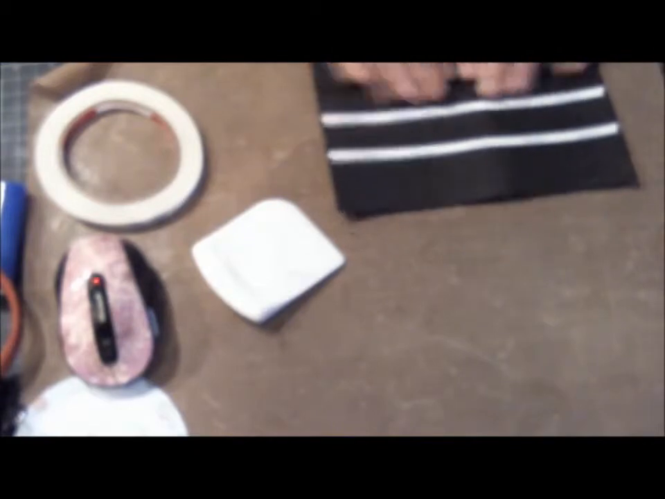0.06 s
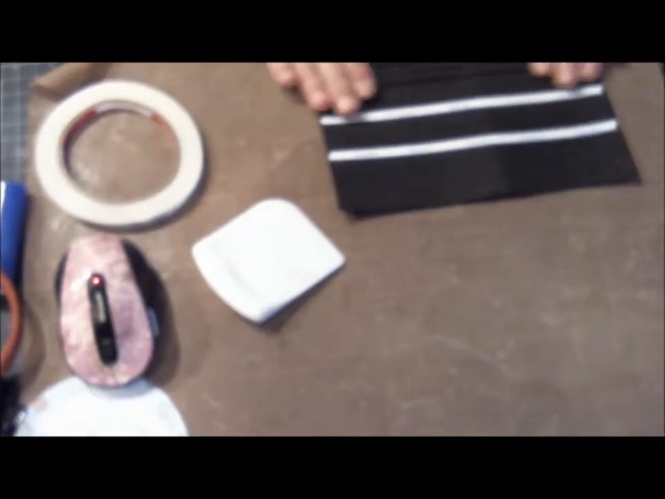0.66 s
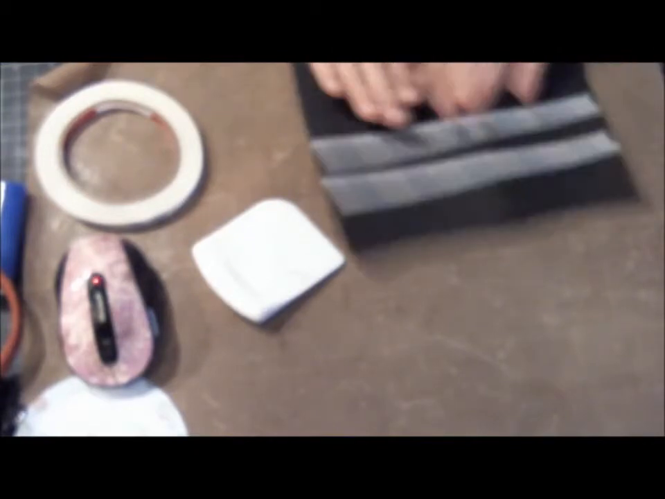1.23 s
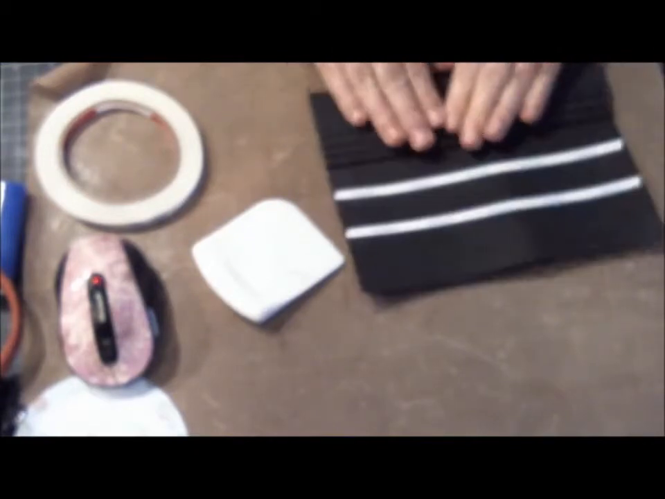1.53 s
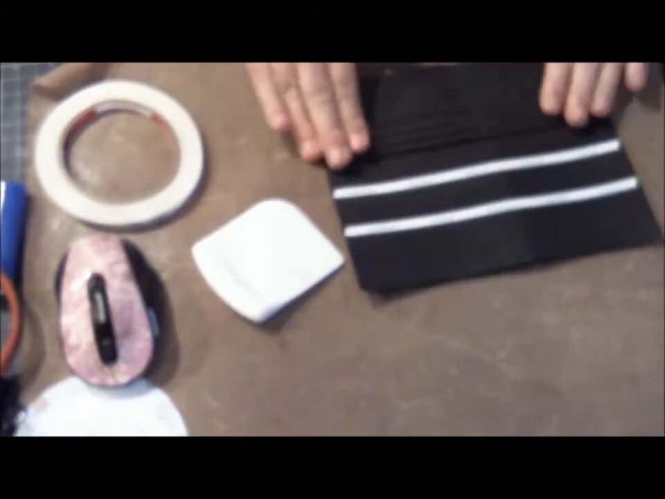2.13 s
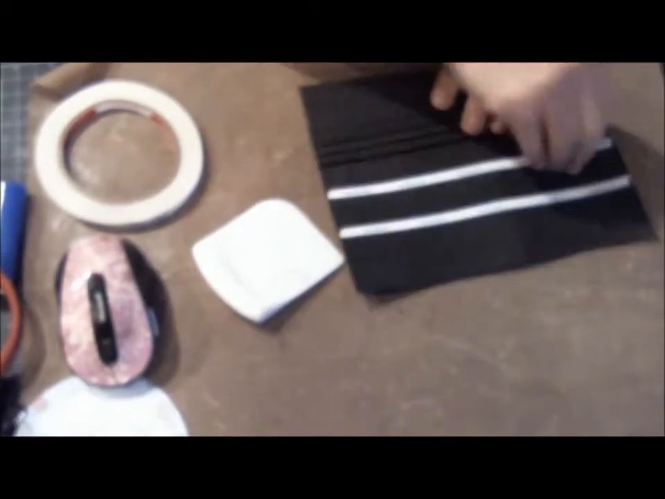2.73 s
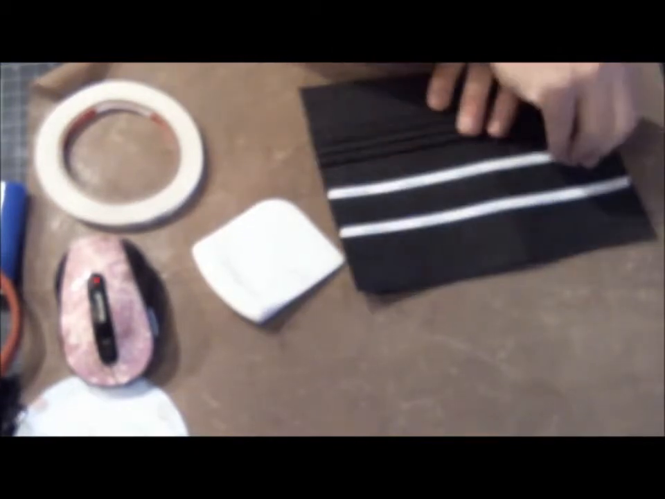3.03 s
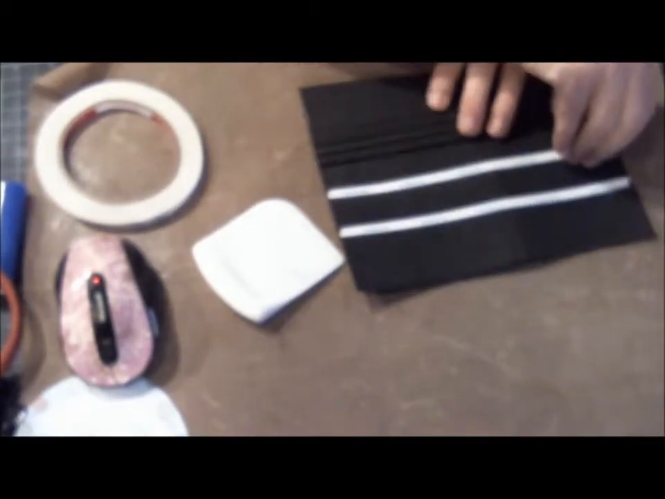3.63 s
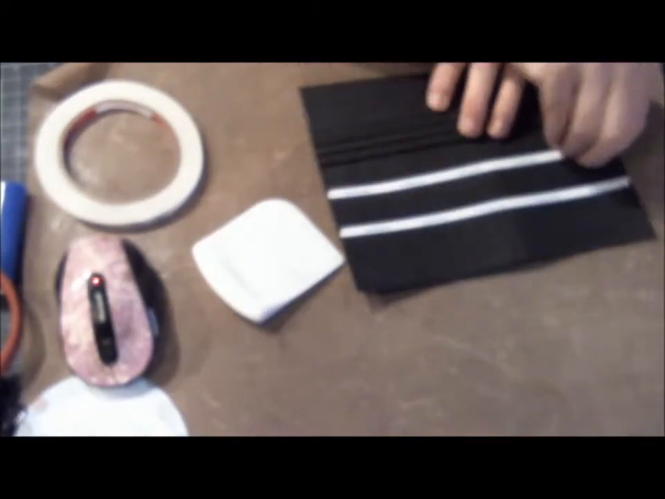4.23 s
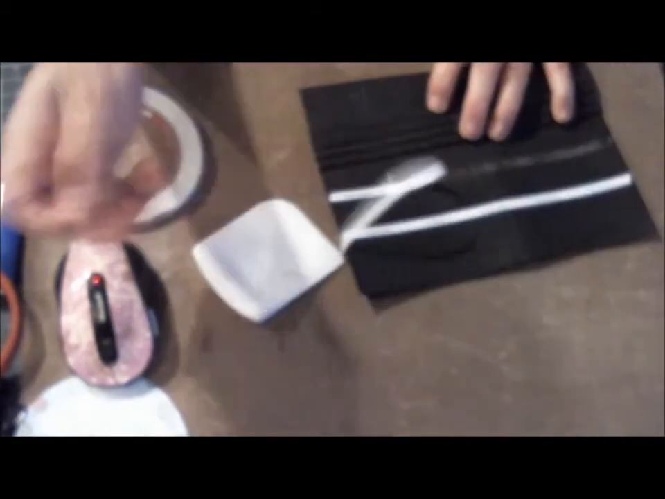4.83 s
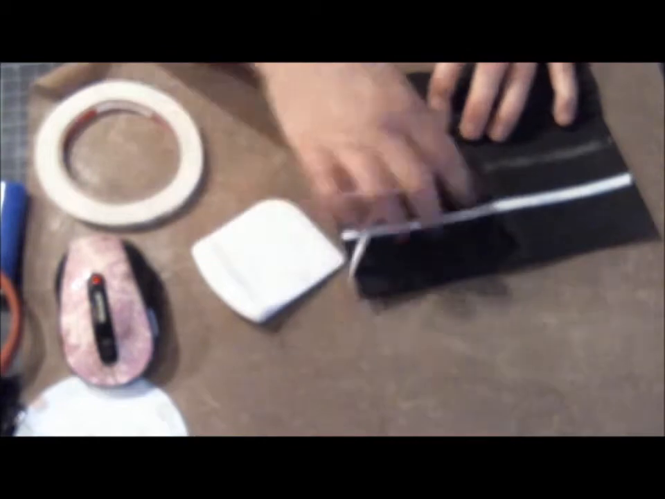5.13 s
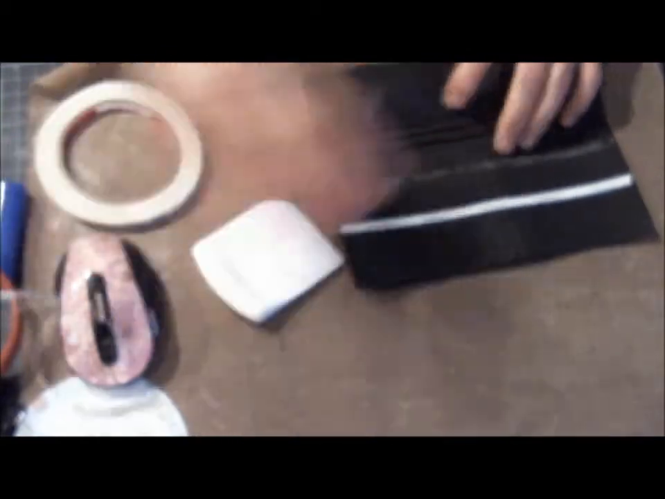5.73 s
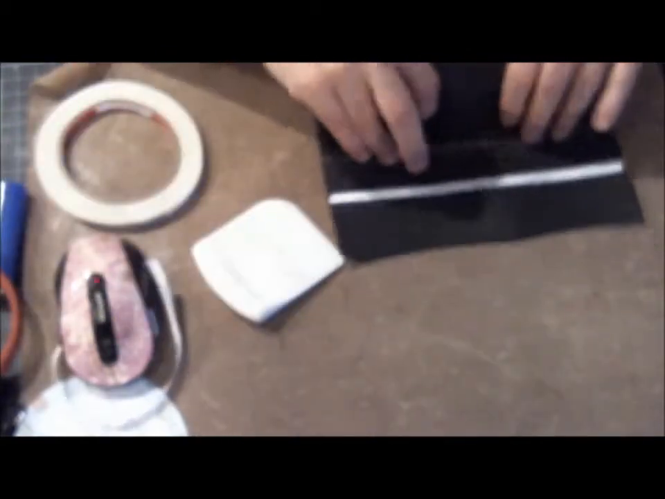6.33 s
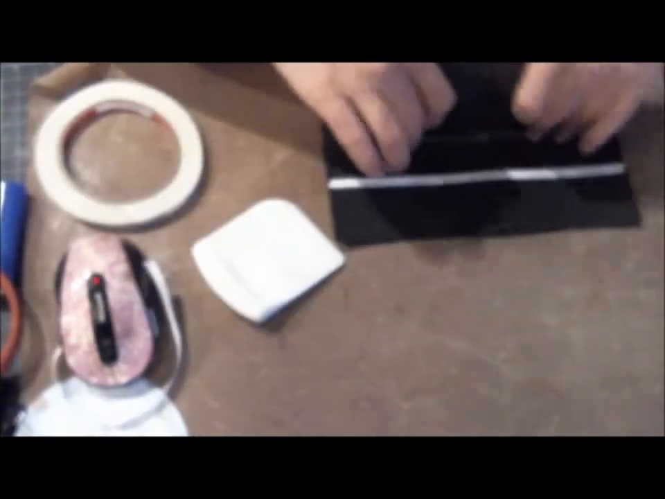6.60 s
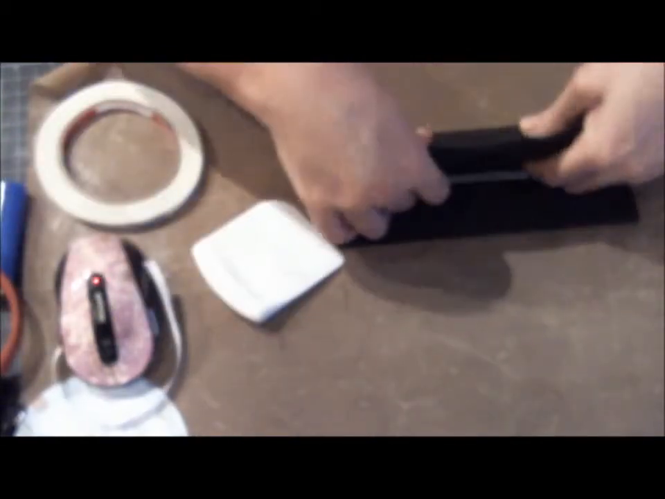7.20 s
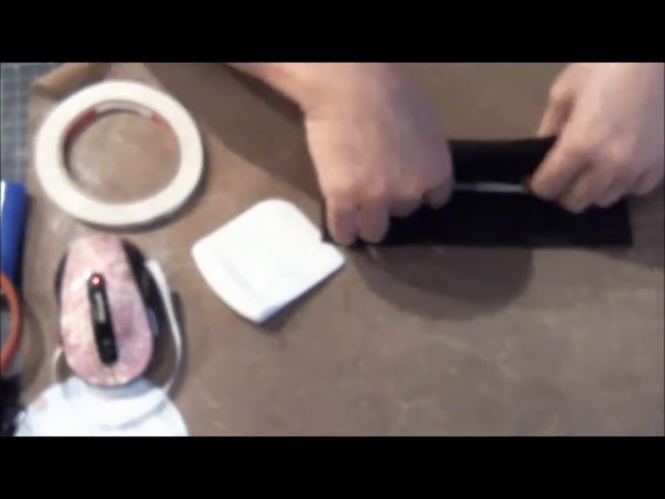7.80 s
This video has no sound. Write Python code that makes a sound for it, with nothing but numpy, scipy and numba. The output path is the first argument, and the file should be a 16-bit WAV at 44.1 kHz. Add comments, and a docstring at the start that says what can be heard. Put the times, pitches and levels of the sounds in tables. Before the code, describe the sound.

In a small room, a desk microphone hears heavy card being rubbed and shifted over a table in uneven, papery swishes, with a few ticks and a soft bump. A lull leaves only faint hum, a thin whine and low blips. Then a tape backing comes away with a light crackle and a bright flick. Sharp clicks and a hollow clap follow, the card snaps along its folds, and a last rub ends in dull table thumps.

```python
"""First you hear hands sliding and pressing a sheet of heavy card over a craft table: its fibres catch
and slip, so it hisses and rasps. Then the liner comes off a strip of tape in little jerks, and the card
is folded, its scored creases giving way with sharp snaps. Now and then the table gives a dull thump.
One desk microphone hears it all in a small room, with faint low blips, a hum and an electronic whine."""
import sys
import numpy as np
from scipy import signal
from scipy.fft import rfft, irfft, next_fast_len
from scipy.io import wavfile
from scipy.ndimage import uniform_filter1d
from numba import njit

SR = 44100
rng = np.random.default_rng(int(sys.argv[2]) if len(sys.argv) > 2 else 0)


def transcribe(u):
    """Save the signal u as a 16-bit wav file named by the first command-line argument.

    u: samples, shape (n,) or (channels, n), limited to [-1, 1]; the rate is SR.
    q: integer samples, one column per channel.
    """
    v = np.clip(np.atleast_2d(u).T, -1, 1)
    q = np.round(v * 32767).astype(np.int16)
    wavfile.write(sys.argv[1], SR, q)


N = 351064
TIME = np.arange(N) / SR

# Creases giving way. Each row: start in seconds, relative level in dB, brightness in dB per octave,
# flutter time in seconds, lower and upper edge of the sound's range in Hz.
CREASE_SNAPS = [(6.2066, -6.5, 0.3, 0.0032, 448, 4830), (6.5263, -7, -0.67, 0.017, 150, 11100),
                (7.259, -7, 0.5, 0.012, 1020, 10800)]
# The tone of a crease, then of a tick. Each row: frequency in Hz, relative level in dB.
CREASE_SPECTRUM = [(100, -20), (300, -13), (520, -9.5), (850, -6), (1100, 1.5), (1400, 0.5), (2150, 1.5),
                   (2650, -3.5), (3700, -2), (5000, -4.5), (6200, -5.5), (7500, -24), (10500, -29.5),
                   (15500, -61)]
TICK_SPECTRUM = [(100, -39), (500, -31.5), (1200, -13.5), (2400, -22.5), (4000, -0.5), (5000, 0), (6100, 9),
                 (6800, -6.5), (7700, -23), (10000, -40), (13000, -46), (16000, -96)]


def sliding_card():
    """Light sliding hisses; under pressure, coarser slips rasp and set the sheet itself ringing."""
    # The tone of each of the four layers. Each row: frequency in Hz, relative level in dB.
    hiss_spectrum = [(2200, -46.5), (3300, -26.5), (4300, -7.5), (5100, -1.5), (6000, 4), (6600, -3),
                     (7200, -13), (7800, -46), (9000, -31), (15000, -62.5)]
    rasp_spectrum = [(1500, -57), (2400, -6), (2950, -1.5), (3500, -1.5), (4100, -0.5), (4600, -1),
                     (5500, -7.5), (9000, -45)]
    sheet_spectrum = [(100, -43), (450, -1.5), (1000, -13), (1400, -4.5), (2000, 1), (2350, -2),
                      (3000, -6.5), (5000, -36), (9000, -57)]
    fibre_spectrum = [(3000, -8.5), (6800, -11.5), (8000, 1.5), (9200, 1.5), (10500, -5), (12000, -12),
                      (13500, -22), (15500, -42)]
    # The card rings lower when more of it is free to bend.
    # Each row: time in seconds, pitch of the edge in Hz, pitch of the sheet in Hz.
    card_pitches = [(0, 3660, 1630), (.4, 4120, 1700), (1.02, 3550, 2030), (1.242, 3900, 1480),
                    (1.8, 4300, 1750), (2.3, 4000, 1920), (2.49, 3320, 2000), (4.38, 3960, 2030),
                    (4.5, 3580, 2020), (4.6, 3840, 2050), (5.83, 3940, 1710), (6.09, 3800, 1930),
                    (7.75, 3830, 1780)]
    times, edge_hz, sheet_hz = np.transpose(card_pitches)
    hiss_gain, rasp_gain, sheet_gain, fibre_gain = hand_strokes()
    fine = slips(per_s=9000, spread_db=2.5, smooth_share=1.0)
    coarse = slips(per_s=2600, spread_db=2.0, smooth_share=0.64)
    edge = moving_resonance(coarse, np.interp(TIME, times, edge_hz), width_hz=1040)
    sheet = moving_resonance(coarse, np.interp(TIME, times, sheet_hz), width_hz=600)
    sound = hiss_gain * from_db(-0.5) * rms_one(colour(fine, hiss_spectrum))
    sound += rasp_gain * from_db(0.5) * rms_one(colour(edge, rasp_spectrum))
    sound += sheet_gain * from_db(-0.17) * rms_one(colour(sheet, sheet_spectrum))
    sound += fibre_gain * from_db(0.85) * rms_one(colour(fine, fibre_spectrum))
    judder_db = 1.53 * drift(per_s=73)
    return sound * from_db(judder_db)


def hand_strokes():
    """Each stroke speeds up and slows down; speed and pressure set how loud the sliding layers are."""
    # Swings of hand and card. Each row: start, rise time and fall time in seconds, relative level in dB,
    # pressure from 0 to 1, fibre hiss in dB compared with that level.
    strokes = [ (-.015, 0.042, .065, -38, 0.47, -17), (.026, 0.027, 0.025, -41, 0.83, -16),
               (0.188, .046, 0.076, -48.5, 0.48, -24), (0.295, 0.11, .14, -44, 0.51, -19),
               (.44, .13, 0.064, -48, 0.47, -19), (.58, 0.095, 0.073, -53.5, 0, -22),
               (0.939, 0.03, 0.1, -40, 0.63, -15), (0.996, 0.029, 0.034, -31.5, 0.85, -17.5),
               (1.043, 0.032, .045, -42, 0.77, -23.5), (1.15, 0.069, .03, -54.5, 0.63, -34),
               (1.182, 0.047, .11, -39.5, 0.81, -25), (1.4, 0.078, 0.12, -67.5, 0.8, -24),
               (1.7, .06, .05, -48.5, 0.48, -18), (1.777, 0.054, 0.11, -49.5, 0.54, -18),
               (1.858, 0.037, 0.074, -47.5, .35, -12), (1.905, 0.056, 0.083, -47, .25, -17.5),
               (1.99, 0.079, 0.053, -52, .05, -14), (2.243, 0.066, 0.1, -45, 0.62, -17),
               (2.339, 0.059, 0.074, -39.5, 0.71, -20), (2.429, 0.049, 0.045, -49, 0.84, -27),
               (2.563, 0.011, .07, -66, 0.6, -27), (2.59, .098, .028, -66, 0.5, -15),
               (4.36, 0.066, 0.02, -48.5, 0.79, -31), (4.42, 0.023, 0.056, -55, 0.86, -40),
               (4.46, 0.059, 0.028, -47, 0.88, -40), (4.5, 0.096, 0.086, -55, 0.76, -35),
               (4.818, .024, .028, -69.5, .15, -16), (5.183, .01, 0.039, -61, .45, -20),
               (5.263, 0.027, .06, -63, 0.51, -31), (5.3, 0.076, 0.022, -55, 0.76, -18.5),
               (5.503, 0.044, 0.02, -56.5, 0.64, -20), (5.589, 0.044, 0.031, -54.5, 0.59, -25),
               (5.65, 0.047, 0.04, -61, 0.46, -30), (5.82, 0.011, 0.013, -47.5, .67, -29),
               (5.885, 0.0087, 0.025, -61, 0.6, -32), (6.02, 0.026, 0.027, -50, 0.78, -38),
               (6.076, .012, 0.034, -57, 0.98, -44), (6.15, 0.049, .02, -62, 0.84, -30),
               (6.345, .023, 0.018, -59, 0.74, -33), (6.442, 0.03, .027, -56, 0.4, -30),
               (6.683, .031, 0.022, -55.5, .8, -33), (6.785, 0.02, 0.13, -69, 0.85, -29),
               (6.97, 0.051, 0.038, -65.5, 0.87, -19), (7.285, 0.017, .065, -54.5, 0.79, -37),
               (7.468, 0.025, 0.023, -54.5, 0.5, -19), (7.703, 0.049, 0.045, -46.5, 0.87, -23),
               (7.862, .028, 0.057, -60.5, 0, -15), (7.915, .048, .04, -55.5, 0.1, -36)]
    # How hiss, rasp and ringing sheet answer the hand. Each row: gain in dB at the lightest touch,
    # gain in dB at full pressure, the power that the speed is raised to.
    touch_response = [(0.5, -7.5, 1.13), (-9, 1.5, 1.32), (-33.5, 6, 1.4)]
    power = np.zeros((4, N))
    for start_s, rise_s, fall_s, db, pressure, fibre_db in strokes:
        moving = (TIME > start_s) & (TIME < start_s + rise_s + fall_s)
        ramp = np.interp(TIME[moving] - start_s, [0, rise_s, rise_s + fall_s], [0, 1, 0])
        speed = np.sin(np.pi / 2 * ramp)
        bite = pressure ** 2   # only a firm hand makes the card bite into the table
        gains = [from_db(db + light + bite * (firm - light)) * speed ** growth
                 for light, firm, growth in touch_response]
        gains.append(from_db(db + fibre_db) * speed ** 1.33)
        power[:, moving] += np.square(gains)
    return np.sqrt(power)


def snapping_creases():
    """A crease gives way with a snap, which makes the folded panel ring briefly."""
    # The panel's notes. Each row: pitch in Hz, relative level in dB, seconds to fade by 60 dB.
    panel_notes = [(495, -17, 0.05), (1420, -21.5, 0.0069), (2130, -26, 0.0072), (3660, -24, 0.0049)]
    snaps = cracks(CREASE_SNAPS, CREASE_SPECTRUM, flutter_db=-7.5, gain_db=8.5)
    sound = snaps.copy()
    for hz, db, fade_s in panel_notes:
        decay, turn = from_db(-60 / (fade_s * SR)), 2 * np.pi * hz / SR
        feedback = decay * np.cos(turn)
        ring = signal.lfilter([1, -feedback], [1, -2 * feedback, decay ** 2], snaps + 1e-18)
        sound += from_db(db) * np.sin(turn) * ring
    return sound


def straining_creases(gain_db, rise_s):
    """Fibres in a crease crackle ever louder in the moment before it gives way."""
    strain, t = np.zeros(N), np.arange(-rise_s, 0, 1 / SR)
    for snap_s, db, *_ in CREASE_SNAPS:
        add(strain, snap_s - rise_s, from_db(db + gain_db + 30 * t / rise_s))
    crackle = slips(per_s=2800, spread_db=4.0, smooth_share=0.89)
    return strain * rms_one(colour(crackle, CREASE_SPECTRUM, tilt_db=-1.0))


def ticking_edges():
    """Card edges and fingernails make small, sharp ticks."""
    # Each row: start in seconds, relative level in dB, brightness in dB per octave, flutter in seconds.
    ticks = [(.735, -42, -6.5, 0.007), (1.0105, -42, 5, 0.017), (1.0165, -31, -10, 0.0066),
             (1.0205, -28, 6, 0.0059), (1.043, -31, -2, .005), (4.378, -52, 0, .004),
             (4.3985, -42, -2, 0.0028), (4.412, -55, -6, .0025), (5.1885, -46, 3, 0.0055),
             (5.6822, -43, 1, .006), (5.7146, -21.5, 6, 0.014), (5.7405, -28, 0.5, 0.015),
             (5.7738, -39.5, -4, 0.0029), (6.0255, -41, -2, 0.0033), (6.7752, -21, -4, 0.061),
             (6.8395, -35, 5, 0.0036)]
    return cracks(ticks, TICK_SPECTRUM, flutter_db=-6.0, gain_db=12.0)


def clapping_sheet():
    """The sheet lands on the table with a hollow clap."""
    # Each row: start in seconds, relative level in dB, brightness in dB per octave, flutter in seconds.
    claps = [(5.715, -38.5, -7, 0.042), (5.8225, -27, -4, 0.078), (5.834, -34, -0.5, 0.017),
             (6.7755, -47, -3, 0.011)]
    # The hollow tone. Each row: frequency in Hz, relative level in dB.
    clap_spectrum = [(200, -50), (1000, -31), (1400, -2), (1650, 1.5), (2000, -3.5), (2600, -22),
                     (8000, -48)]
    return cracks(claps, clap_spectrum, flutter_db=-20, gain_db=11.0)


def flicking_tape():
    """The thin liner and the sticky tape flick free and flutter."""
    # Each row: start in seconds, relative level in dB, brightness in dB per octave,
    # flutter time in seconds, lower and upper edge of the sound's range in Hz.
    flicks = [(4.6852, -24, 1.5, 0.021, 800, 17000), (6.7754, -20.5, 9.5, 0.015, 2580, 7600)]
    # The bright tone of a flick. Each row: frequency in Hz, relative level in dB.
    flick_spectrum = [(200, -69), (1200, -45), (2000, -9), (3200, 5.5), (4200, 0), (5500, 6), (6800, -1.5),
                      (7800, -10.5), (10000, -11.5), (12500, -12.5), (14000, -28), (16000, -11)]
    return cracks(flicks, flick_spectrum, flutter_db=19, gain_db=9.0)


def peeling_liner(start_s, end_s, level_db):
    """The liner lets go of the tape in separate little jerks."""
    fade_in, fade_out = (TIME - start_s) / 0.0045, (end_s - TIME) / 0.045
    pulling = np.clip(np.minimum(fade_in, fade_out), 0, 1)
    jerks = slips(per_s=180, spread_db=19.0, smooth_share=0)
    return pulling * from_db(level_db) * rms_one(colour(jerks, TICK_SPECTRUM, tilt_db=-4.5))


def thumps_and_blips(rumble_db, rumble_fade_s):
    """Dull thumps on the table with a brief rumble, and faint, soft low blips in the background."""
    # Each row: time of the peak in seconds, level in dB, pitch in Hz, half the length in seconds.
    low_pulses = [(0.207, -64, 340, .04), (.838, -59.5, 267, 0.027), (1.022, -38.5, 222, .0078),
                  (1.037, -39, 141, 0.01), (1.108, -47, 147, .018), (1.187, -56, 350, 0.033),
                  (1.364, -56, 387, 0.025), (1.524, -56, 358, 0.035), (1.721, -57, 323, 0.02),
                  (1.994, -57, 348, 0.018), (2.353, -57, 328, 0.04), (3.06, -56.5, 137, .033),
                  (3.72, -50.5, 115, 0.029), (4.027, -49, 110, 0.0056), (5.13, -53, 187, 0.034),
                  (5.701, -33, 122, 0.016), (5.796, -42, 99, 0.024), (6.664, -50.5, 306, 0.011),
                  (7.48, -58, 80, 0.022), (7.781, -31, 185, 0.0083), (7.798, -37, 119, 0.027),
                  (7.887, -38.5, 141, 0.013), (7.906, -46.5, 102, .027)]
    # The rumble after each pulse. Each row: frequency in Hz, relative level in dB.
    rumble_spectrum = [(15, -59), (35, -24), (65, 20), (200, 6.5), (420, -15), (700, -12), (3000, -59)]
    pulses, rumble_gain, after = np.zeros(N), np.zeros(N), TIME[:SR // 4]
    for peak_s, db, hz, half_s in low_pulses:
        t = np.arange(-half_s, half_s, 1 / SR)
        swell = np.exp(-(np.pi * t / half_s) ** 2)
        add(pulses, peak_s - half_s, from_db(db) * np.sin(2 * np.pi * hz * t) * swell)
        add(rumble_gain, peak_s, from_db(db - 60 * after / rumble_fade_s) * np.minimum(after / 0.0042, 1))
    rumble = rms_one(colour(rng.standard_normal(N), rumble_spectrum))
    return pulses + from_db(rumble_db) * rumble_gain * rumble


def small_room(sound, build_s, fade_s, tail_db):
    """Near walls send back a few echoes, which blur into a short tail."""
    # Each row: delay in seconds, level in dB compared with the direct sound.
    wall_echoes = [(.0074, -17.5), (0.0107, -13), (0.0164, -20)]
    t = TIME[:SR // 4]
    tail = rng.standard_normal(len(t)) * from_db(-60 * t / fade_s) * np.minimum(t / build_s, 1) ** 2
    response = from_db(tail_db) * unit_energy(flatten_spectrum(tail))
    response[0] = 1   # the direct sound
    for delay_s, db in wall_echoes:
        response[round(delay_s * SR)] += from_db(db)
    return signal.fftconvolve(sound, flatten_spectrum(response))[:N]


def background(noise_db, whine_db, whine_hz, switches_per_s):
    """Room noise, steady hum and whine, and a thin high tone that switches on and off."""
    # The room's noise. Each row: frequency in Hz, relative level in dB.
    noise_spectrum = [(15, -50), (30, -32.5), (50, -15), (85, -4), (170, -3), (240, -3.5), (340, -0.5),
                      (520, -10), (900, -11.5), (1300, -10), (2200, -16.5), (4000, -21), (6000, -24),
                      (7500, -30), (10000, -36), (15500, -38)]
    # Mains hum and electronic whine. Each row: pitch in Hz, average (rms) level in dB.
    steady_tones = [(120, -68), (360, -87.5), (1125, -82.5), (1378, -78.5), (2755, -71), (4133, -84.5),
                    (5511, -94), (5663, -90), (7004, -101)]
    noise = from_db(noise_db) * rms_one(colour(rng.standard_normal(N), noise_spectrum))
    tones = sum(from_db(db) * np.sin(2 * np.pi * (hz * TIME + rng.random())) for hz, db in steady_tones)
    cycle = np.cos(2 * np.pi * switches_per_s * TIME + 1.45)
    switch = np.clip((cycle + 0.58) * 4, 0, 1)   # on for about two thirds of each cycle
    whine = from_db(whine_db) * switch * np.sin(2 * np.pi * whine_hz * TIME)
    return noise + np.sqrt(2) * (tones + whine)


def slips(per_s, spread_db, smooth_share):
    """Fibres catch and let go: tiny clicks of uneven size over a smooth hiss."""
    sizes = from_db(spread_db * np.minimum(rng.exponential(1, N), 4)) * rng.choice([-1, 1], N)
    clicks = rms_one(sizes * (rng.random(N) < per_s / SR))
    return clicks + smooth_share * rng.standard_normal(N)


def cracks(events, spectrum, flutter_db, gain_db):
    """Each sudden release is one sharp pulse, then a flutter that fades by 60 dB in its flutter time."""
    track, t = np.zeros(N), TIME[:2048]
    for start_s, db, tilt_db, flutter_s, *band_hz in events:
        pulse = from_db(flutter_db) * rng.standard_normal(len(t)) * from_db(-60 * t / flutter_s)
        pulse[0] = 1
        pulse = flatten_spectrum(pulse)
        if band_hz:   # a narrow panel gives off less bass, a slow release less treble
            pulse = signal.sosfilt(signal.butter(2, band_hz, "band", fs=SR, output="sos"), pulse)
        add(track, start_s, from_db(db + gain_db) * unit_energy(colour(pulse, spectrum, tilt_db)))
    return track


@njit
def moving_resonance(x, hz, width_hz):
    """Make a sound ring at a pitch that changes as it goes."""
    turn, decay = 2 * np.pi * hz / SR, np.exp(-np.pi * width_hz / SR)
    y = np.zeros(len(x))
    for i in range(2, len(x)):
        y[i] = x[i] - x[i - 2] + 2 * decay * np.cos(turn[i]) * y[i - 1] - decay * decay * y[i - 2]
    return y


def colour(x, spectrum, tilt_db=0):
    """Shape a sound's tone to a spectrum, made brighter by tilt_db per octave."""
    size = 2 * next_fast_len(len(x) // 2 + 2048)
    octave = np.log2(np.maximum(np.arange(size // 2 + 1) * SR / size, 1))
    hz, db = np.transpose(spectrum)
    octave = np.clip(octave, np.log2(hz[0]) - 1, np.log2(hz[-1]))
    shape_db = np.interp(octave, np.log2(hz), db) + tilt_db * (octave - np.log2(hz).mean())
    # A minimum-phase filter: it rings after a click, never before it.
    cepstrum = irfft(shape_db * np.log(10) / 20)
    cepstrum[1:size // 2] *= 2
    cepstrum[size // 2 + 1:] = 0
    return irfft(rfft(x, size) * np.exp(rfft(cepstrum)))[:len(x)]


def flatten_spectrum(x):
    """Spread the energy evenly from bass to treble, keeping the fine ripple."""
    power = uniform_filter1d(np.abs(rfft(x, 16384)) ** 2, size=121)
    hz = np.linspace(0, SR / 2, len(power))
    return colour(x, np.column_stack([hz, -10 * np.log10(power)])[1:])


def drift(per_s):
    """A random wander of typical size 1 that turns about per_s times a second."""
    return rms_one(np.interp(TIME * per_s, np.arange(N), rng.standard_normal(N)))


def add(track, start_s, sound):
    """Mix a short sound into a track."""
    start = max(round(start_s * SR), 0)
    track[start:start + len(sound)] += sound[:N - start]


def from_db(db):
    """Turn decibels into a gain."""
    return 10 ** (np.asarray(db) / 20)


def rms_one(x):
    """Scale to an average (rms) size of 1."""
    return x / np.sqrt(np.mean(x ** 2) + 1e-20)


def unit_energy(x):
    """Scale so that the squared samples add up to 1."""
    return x / np.sqrt(np.sum(x ** 2) + 1e-20)


def scene():
    """Card, tape and table in the room; one microphone feeds both channels."""
    handling = sliding_card()
    handling += peeling_liner(start_s=4.376, end_s=4.655, level_db=-62.5)
    handling += straining_creases(gain_db=-27, rise_s=0.014)
    handling += snapping_creases() + ticking_edges() + flicking_tape() + clapping_sheet()
    mono = thumps_and_blips(rumble_db=-9, rumble_fade_s=0.11)
    mono += small_room(handling, build_s=0.013, fade_s=0.096, tail_db=-10)
    mono += background(noise_db=-66.5, whine_db=-79.5, whine_hz=8000, switches_per_s=17.22)
    return np.stack([mono, mono])


def record(dry):
    """The microphone drops the deepest bass; the highest treble is cut steeply."""
    bass_cut = signal.butter(2, 38, "high", fs=SR, output="sos")
    treble_cut = signal.ellip(12, .1, 80, 15750, fs=SR, output="sos")
    return signal.sosfilt(treble_cut, signal.sosfilt(bass_cut, dry))


dry = scene()
out = record(dry)
transcribe(out)
```